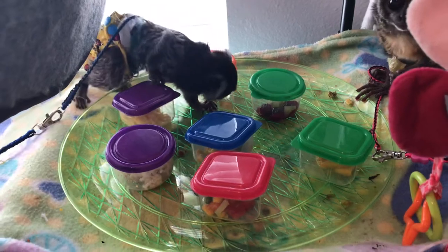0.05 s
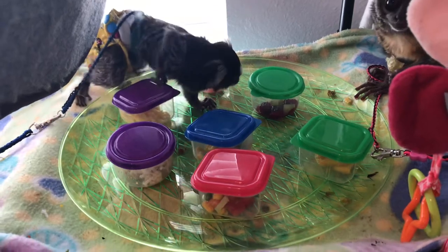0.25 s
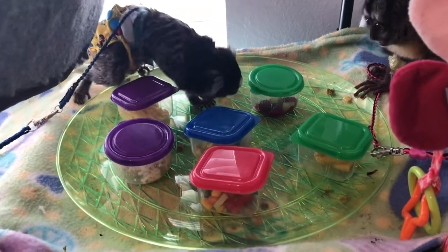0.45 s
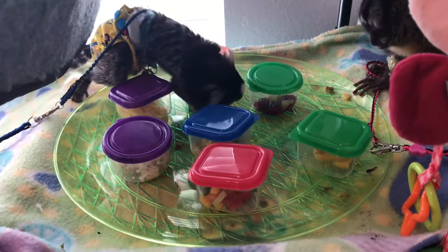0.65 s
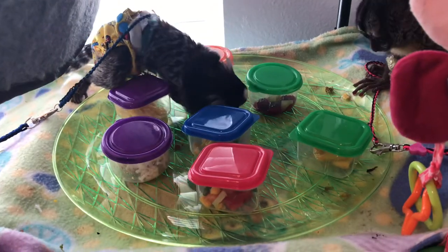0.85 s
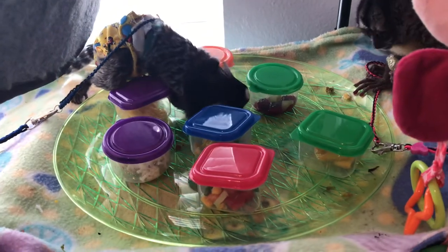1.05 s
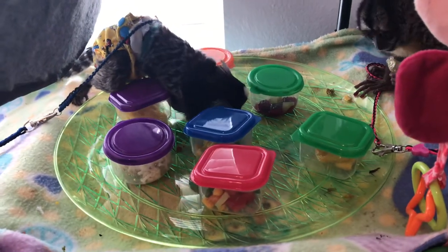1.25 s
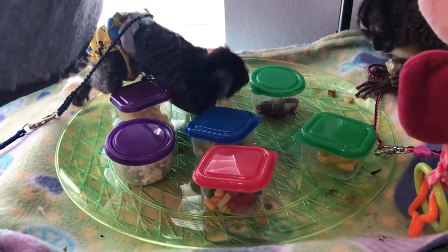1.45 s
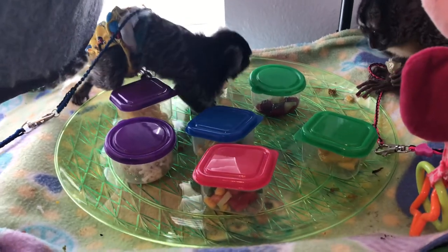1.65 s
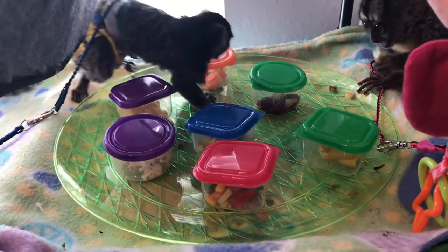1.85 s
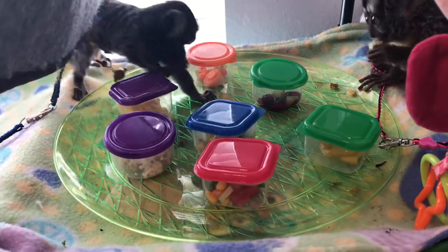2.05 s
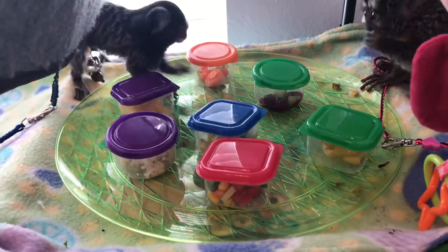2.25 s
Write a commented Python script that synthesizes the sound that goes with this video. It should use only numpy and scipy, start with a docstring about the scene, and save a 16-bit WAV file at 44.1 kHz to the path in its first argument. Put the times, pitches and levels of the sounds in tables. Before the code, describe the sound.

Bright metallic jingling from a little monkey's harness as plastic tubs clack on a tray.

```python
"""Two little metal pieces jingle on the harness of a small monkey stepping about on a plastic tray.
Each touch makes the metal tick, ring and bounce. Hardware and tubs clack on the tray, claws tick
on lids, and there are muffled clinks, soft low knocks and a faint rustle.
It all happens close by, in a quiet furnished room with a low hum."""
import sys
import numpy as np
from scipy import signal
from scipy.fft import rfft, irfft, next_fast_len
from scipy.io import wavfile
from scipy.ndimage import uniform_filter1d

SR = 44100
rng = np.random.default_rng(int(sys.argv[2]) if len(sys.argv) > 2 else 0)


def log_audio(samples):
    """Write samples as a 16-bit WAV file to the path given in sys.argv[1]."""
    # one column per channel
    frames = np.atleast_2d(samples).T
    # limit to full scale, then quantise
    limited = np.clip(frames, -1, 1)
    pcm = np.round(limited * 32767).astype(np.int16)
    wavfile.write(sys.argv[1], SR, pcm)


N = 101429
T = np.arange(N) / SR
AGE = T[:SR // 3]  # seconds since a hit
GRAIN = 2048  # samples in a scrap of noise
RISE_S, KNOCK_RISE_S = 0.00053, 0.00086


def amp(db):
    """Turn decibels into a gain."""
    return 10 ** (np.asarray(db) / 20)

def add(out, s, sound):
    """Mix a sound in at s seconds."""
    i = max(int(s * SR), 0)
    out[i:i + len(sound)] += sound[:max(N - i, 0)]

def fade(t60):
    """Die away by 60 dB in t60 seconds, the "fade" in the tables."""
    t60 = max(t60, 1e-3)
    return np.exp(-np.log(1000) * AGE[:int(t60 * SR)] / t60)

def noise(gain, size):
    """Noise of strength 1, its tone shaped by gain(frequency)."""
    n = next_fast_len(size)
    spectrum = rfft(rng.standard_normal(n)) * gain(np.fft.rfftfreq(n, 1 / SR) + 1)
    hiss = irfft(spectrum, n)[:size]
    return hiss / hiss.std()

def coloured(points, size):
    """Noise with a colour: a balance of low and high, given as (f/Hz, level/dB) points."""
    hz, db = np.array(points).T
    return noise(lambda f: amp(np.interp(np.log(f), np.log(hz), db)), size)

def flicker(db, hz):
    """A gain that wanders by about db, up to about hz times a second."""
    return amp(db * noise(lambda f: 1 / (1 + (f / hz) ** 4), N))

def burst(hiss, t60):
    """Let noise die away, with the same energy every time."""
    shape = fade(t60)
    puff = np.resize(hiss, len(shape)) * shape
    return puff * np.sqrt(np.sum(shape ** 2) / np.sum(puff ** 2))

def note(hz, t60, rise_s):
    """One pure tone that swells quickly and fades."""
    shape = fade(t60)
    age = AGE[:len(shape)]
    return shape * (1 - np.exp(-age / rise_s)) ** 2 * np.sin(2 * np.pi * hz * age)

def ring(tones, scatter_db=1.5, detune_cycles=1.44):
    """A struck object's tones vary with each hit; the shortest stray most in pitch."""
    out = np.zeros(len(AGE))
    for hz, db, t60 in tones:
        size, pull = rng.standard_normal(2)
        tone = note(hz + detune_cycles * pull / t60, t60, RISE_S)
        out[:len(tone)] += amp(db + scatter_db * size) * tone
    return out


# Colour of the room's noise: f/Hz, level/dB
ROOM_NOISE = [(22,-25.5),(60,6),(95,-5.5),(160,-7),(400,-8.5),(600,-16.5),(1600,-23.5),(5000,-28),(16000,-35)]
# Hum tones: f/Hz, level/dB, width/Hz
HUM_TONES = [(66.8,-59,13),(122.2,-67.5,31),(243.2,-67.5,6.1)]

def background():
    """Steady room noise and a wavering low hum, made of narrow bands of noise."""
    hum = sum(amp(db) * noise(lambda f: 1 / (1 + ((f - hz) / width * 2) ** 2), N)
              for hz, db, width in HUM_TONES)
    return hum + amp(-60) * coloured(ROOM_NOISE, N)


# How the rustle swells and sinks: t/s, level/dB
RUSTLE_LEVELS = [(0,-68.5),(0.719,-60.5),(.8,-61.5),(0.873,-60),(0.908,-77),(0.945,-62),(0.99,-78),(1.04,-68),(1.19,-64.5),(1.25,-68.5),(1.85,-69),(2.0,-53),(2.3,-75)]
# Its colour: f/Hz, level/dB
RUSTLE_COLOUR = [(500,-2),(2700,-5.5),(3700,1.5),(4600,-3),(5400,-10.5),(17000,-21.5)]

def rustle():
    """A faint hiss whose level flickers quickly."""
    times, levels = np.array(RUSTLE_LEVELS).T
    swell = amp(np.interp(T, times, levels))
    return coloured(RUSTLE_COLOUR, N) * swell * flicker(db=4.5, hz=107.5)


# Main tones of the larger and the smaller metal piece: f/Hz, level/dB, fade/s
LARGE_TONES = [(3277,-5.5,0.031),(3362,-3,0.029),(3720,-11,0.017),(3426,-22,0.21),(4490,-19,0.016)]
SMALL_TONES = [(6626,6.5,0.017),(6846,-5.5,0.011),(6946,-4.5,0.014),(6150,-26.5,0.1)]

def large_ping():
    """One touch sets the larger piece's body ringing briefly."""
    return ring(LARGE_TONES)

def small_ping():
    """The smaller piece rings higher, at a slightly different pitch each time."""
    pitch = 1 + 0.0093 * rng.standard_normal()
    return ring([(hz * pitch, db, t60) for hz, db, t60 in SMALL_TONES])


# When the harness moves: start t/s, end t/s
HARNESS_MOVES = [(0.02,.8),(1.35,2.3)]

def stirring(touches=22):
    """The moving harness nudges the two pieces in turn, faintly and unevenly."""
    out = np.zeros(N)
    for start, end in HARNESS_MOVES:
        for k in range(touches):
            s = start + (end - start) * (k + rng.random()) / touches
            gain = amp(-50.5 + 2.5 * rng.standard_normal())
            add(out, s, gain * (small_ping() if k % 2 else large_ping()))
    return out


def crack(lo, hi, t60):
    """Struck plastic: so many short tones that they blur into noise from lo to hi Hz."""
    puff = burst(rng.standard_normal(2 * GRAIN), t60)
    spectrum = rfft(puff, 2 * GRAIN)
    f = np.fft.rfftfreq(2 * GRAIN, 1 / SR) + 1
    power = uniform_filter1d(np.abs(spectrum) ** 2, 25)  # dividing by this evens out the colour
    edge_cut = (1 + (lo / f) ** 20) * (1 + (f / hi) ** 10)
    band = irfft(spectrum / np.sqrt(power * edge_cut))[:min(len(puff), GRAIN)]
    rise = 1 - np.exp(-AGE[:len(band)] * hi)
    return band * np.sqrt(np.sum(puff ** 2) / np.sum(band ** 2)) * rise

# Hits on the tray: t/s, then relative level/dB in five pitch bands, low to high
TRAY_HITS = [(0.036,-71,-61,-49,-46.5,-55.5),(0.21,-38,-53,-26,-30,-37.5),(0.2173,-32,-27,-13.5,-15,-12),(0.2282,-36.5,-23,-18.5,-43,-25.5),(0.243,-65,-59,-36,-21,-47),
             (0.3824,-39.5,-22.5,-24.5,-36,-31.5),(0.402,-44,-28,-37.5,-58,-32.5),(0.583,-51.5,-42,-45,-38,-46.5),(0.6737,-42,-29.5,-33.5,-31,-37),
             (0.734,-38.5,-30,-36,-32.5,-40),(1.388,-50,-46,-71,-50,-52),(1.9143,-33.5,-23.5,-35,-16,-17.5),(1.9312,-35,-26,-37.5,-16.5,-25.5),
             (1.993,-61,-37,-40.5,-38,-37),(2.1186,-37,-35,-31.5,-26,-24)]
# Borders of the bands: f/Hz
BAND_EDGES = [300,800,1250,2100,3800,17000]
# How long each band lasts: fade/s
BAND_FADES = [0.077,0.032,0.034,0.015,0.024]
# The tray's own tones: f/Hz, level/dB, fade/s
TRAY_TONES = [(370,-24.5,0.2),(917,-4.5,0.26),(1030,0.5,0.16),(1124,7.5,0.11),(1418,8.5,0.077),(1780,4,0.12),(1857,-5,0.23)]

def tray_clacks():
    """Hardware and tubs hit the tray: a sharp crack, and the plastic rings on softly."""
    out = np.zeros(N)
    for s, *levels in TRAY_HITS:
        for lo, hi, db, t60 in zip(BAND_EDGES, BAND_EDGES[1:], levels, BAND_FADES):
            add(out, s, amp(db - 3.5) * crack(lo, hi, t60))
        middle_db = (levels[1] + levels[2]) / 2
        add(out, s, amp(middle_db - 22) * ring(TRAY_TONES))
    return out


# Colour of a tick: f/Hz, level/dB
TICK_COLOUR = [(500,-14.5),(4000,-9),(6000,14.5),(11000,2.5),(15000,13),(17000,-22.5)]

def tick(t60):
    """Two hard things touch: a tiny burst of bright noise."""
    return burst(coloured(TICK_COLOUR, GRAIN), t60)

def bounces():
    """A touch and five weak bounces soon after, as (delay in seconds, gain)."""
    return [(0.00016, 1)] + [(delay, amp(-21)) for delay in rng.exponential(0.022, 5)]

# Hits on the larger piece: t/s, then relative level/dB of its body and its three high rings
LARGE_HITS = [(.134,-43,-63.5,-55,-46),(.229,-6.5,-30,-50,-42),(.242,-18.5,-29.5,-37,-31),
              (.275,-37,-28.5,-54,-48),(.316,-12.5,-25,-20,-36),(.327,-24.5,-28.5,-20.5,-45),(0.336,-19,-39,-37.5,-34),(.383,-27,-43,-63,-45),(.403,-31.5,-37.5,-48,-52),
              (.466,-21.5,-44.5,-36.5,-33),(0.483,-25,-54,-45,-48),(.508,-25,-53,-38,-44),(.609,-30,-51.5,-49,-52),(.632,-34,-60,-46,-57),
              (.742,-39.5,-62,-48,-63),(1.427,-30,-43,-57,-55),(1.445,-30,-57,-35.5,-44),(1.504,-29.5,-47,-35,-36),(1.529,-32.5,-63,-45.5,-65),(1.597,-29.5,-56,-54,-48),
              (1.628,-33,-51.5,-42.5,-49),(1.655,-34.5,-51,-51,-44),(1.693,-31,-61,-48.5,-65),(1.756,-34.5,-70,-71,-59),(1.914,-10.5,-40,-46,-50),(1.933,-27.5,-36.5,-24,-29),
              (1.994,-26,-53.5,-43,-35),(2.028,-19,-53,-36,-31),(2.046,-24.5,-61,-54,-55),(2.06,-28,-54,-62,-61),(2.073,-26,-51,-68,-46),
              (2.081,-28.5,-45,-55,-43),(2.086,-29.5,-57,-44,-33),(2.164,-37,-46.5,-44,-41),(2.179,-24,-55,-42,-69),(2.247,-42,-67,-53,-48)]
# Its high rings, near 9, 13.4 and 15 kHz: f/Hz, level/dB, fade/s
HIGH_RINGS = [
    [(9160,-1.8,0.3)],
    [(13450,0,0.12)],
    [(14945,-0.43,.09)],
]
# A ring that needs a hit to wake both of the first two: f/Hz, level/dB, fade/s
SHARED_RING = [(9604,1.5,0.22)]
# The short, high zing of every touch: f/Hz, level/dB, fade/s
ZING_TONES = [(14350,-18.5,.018),(15450,-17,.028)]
# Touches that hush all high rings but the lowest: t/s
HUSH_TIMES = [1.51,1.604,1.663,1.698]

def large_jingle(hush_fade_s=0.023):
    """Each hit ticks, zings and pings; the high rings chatter as the metal keeps touching."""
    out, rings = np.zeros(N), np.zeros((len(HIGH_RINGS), N))
    for s, body_db, *ring_dbs in LARGE_HITS:
        brightness = amp((body_db + max(ring_dbs)) / 2)
        for delay, gain in bounces():
            sparkle = np.sqrt(gain) * brightness
            add(out, s + delay, sparkle * amp(-8) * tick(t60=0.0033))
            add(out, s + delay, sparkle * ring(ZING_TONES))
            add(out, s + delay, gain * amp(body_db + 0.5) * large_ping())
        rings *= np.exp(-np.maximum(T - s, 0) / RISE_S)  # a new hit stops the old rings
        next_touch = min([t for t in HUSH_TIMES if t > s], default=np.inf)
        hush = np.exp(-np.log(1000) * np.maximum(s + AGE - next_touch, 0) / hush_fade_s)
        for k, (db, tones) in enumerate(zip(ring_dbs, HIGH_RINGS)):
            add(rings[k], s, amp(db - 0.5) * ring(tones) * (hush if k else 1))
        add(rings[0], s, amp(min(ring_dbs[:2]) - 0.5) * ring(SHARED_RING) * hush)
    return out + rings.sum(axis=0) * flicker(db=1.5, hz=110)


# Muffled clinks: t/s, level/dB
CLINK_HITS = [(0.192,-48.5),(.756,-56),(1.135,-47),(1.151,-42.5),(1.316,-51),(1.328,-44.5)]
# The damped larger piece's tones: f/Hz, level/dB
CLINK_TONES = [(3750,3),(9700,-4),(13500,-12),(15050,0.5)]

def clinks(fade_s=0.02):
    """The larger piece touches while held still: a crisp tick and a ring that dies at once."""
    out = np.zeros(N)
    for s, db in CLINK_HITS:
        add(out, s, amp(db) * ring([(hz, level, fade_s) for hz, level in CLINK_TONES]))
        add(out, s, amp(db) / 2 * tick(t60=0.014))
    return out


# Hits on the smaller piece: t/s, relative level/dB
SMALL_HITS = [(.256,-31.5),(0.261,-30.5),(.277,-29),(.281,-30.5),(0.297,-38),(.330,-27.5),(.338,-28.5),(.359,-31),(.407,-43),(0.422,-39),
              (0.444,-33),(0.458,-38),(0.465,-26),(0.471,-28.5),(0.485,-24.5),(0.505,-27.5),(0.513,-39),(0.581,-33.5),(.609,-38),
              (0.729,-45),(0.792,-54),(1.385,-45),(1.390,-43.5),(1.456,-35.5),(1.538,-40),(1.578,-46),(1.651,-44.5),(1.689,-46.5),(1.823,-55),
              (1.934,-30.5),(2.044,-48),(2.086,-38)]

def small_jingle():
    """The smaller piece pings and ticks at every hit and bounce."""
    out = np.zeros(N)
    for s, db in SMALL_HITS:
        for delay, gain in bounces():
            add(out, s + delay, gain * amp(db + 7.5) * small_ping())
            add(out, s + delay, np.sqrt(gain) / 2 * amp(db - 8) * tick(t60=0.0033))
    return out


# The tub's tones: f/Hz, level/dB, fade/s
TUB_TONES = [(810,-8.5,0.014),(736,-40,0.25)]

def tub_knock(at_s=0.3822):
    """A tub knocks once on the tray with a hollow note."""
    out = np.zeros(N)
    for hz, db, t60 in TUB_TONES:
        add(out, at_s, amp(db) * note(hz, t60, KNOCK_RISE_S))
    return out


# Claws touching lids: t/s, level/dB
CLAW_TAPS = [(.976,-50),(1.839,-46.5)]

def claw_ticks():
    """Claws tap the lids, each making a light tick."""
    out = np.zeros(N)
    for s, db in CLAW_TAPS:
        add(out, s, amp(db) * tick(t60=0.014))
    return out


# Soft bumps: t/s, f/Hz, level/dB, fade/s
BUMPS = [(1.039,268,-32,0.026),(1.056,283,-32.5,0.033),(1.072,297,-35,0.052),(1.077,145,-43,0.3),(1.183,212,-41,0.12),
         (1.356,302,-36,0.032),(1.372,226,-31.5,0.045),(1.377,385,-43.5,0.065)]

def soft_knocks():
    """Padded bumps, each a short low note."""
    out = np.zeros(N)
    for s, hz, db, t60 in BUMPS:
        add(out, s, amp(db) * note(hz, t60, KNOCK_RISE_S))
    return out


# Colour of the echoes: f/Hz, level/dB
ECHO_COLOUR = [(200,9.5),(3500,9),(15000,-1.5)]

def room(sound):
    """Sound bounces quickly off the tray and tubs, then dies away in the room."""
    echoes = np.zeros(SR // 2)
    for db, t60, delay_s in [(-14.5, 0.11, 0.002), (-18, 0.21, 0.008)]:
        tail = burst(coloured(ECHO_COLOUR, len(AGE)), t60)
        add(echoes, delay_s, amp(db) * tail / np.sqrt(np.sum(tail ** 2)))
    return sound + signal.fftconvolve(sound, echoes)[:N]

def scene():
    """The monkey's sounds and their echoes over the room's hum, in one channel."""
    harness = stirring() + large_jingle() + clinks() + small_jingle()
    steps = rustle() + tray_clacks() + tub_knock() + claw_ticks() + soft_knocks()
    return (room(harness + steps) + background())[None]

def record(dry):
    """Cut the treble above 16 kHz."""
    return signal.sosfilt(signal.ellip(8, .2, 70, 16000, fs=SR, output="sos"), dry)


dry = scene()
out = record(dry)
log_audio(out)
```